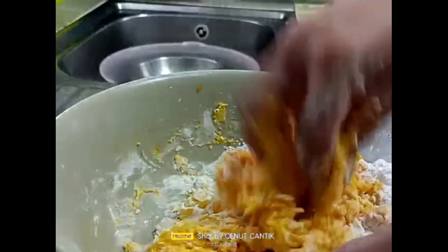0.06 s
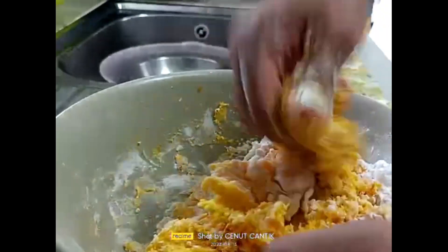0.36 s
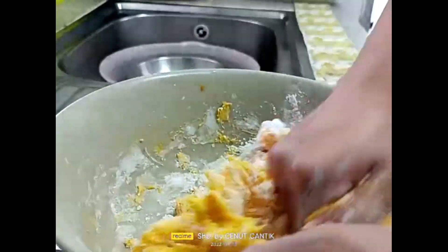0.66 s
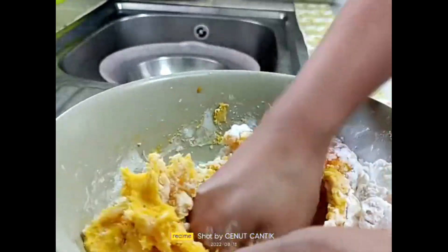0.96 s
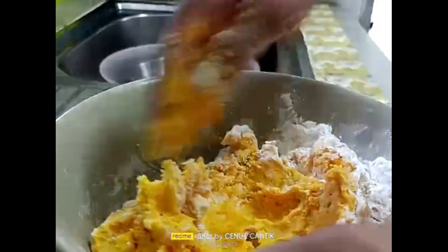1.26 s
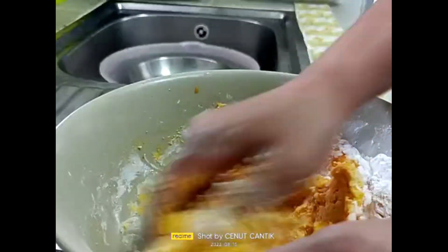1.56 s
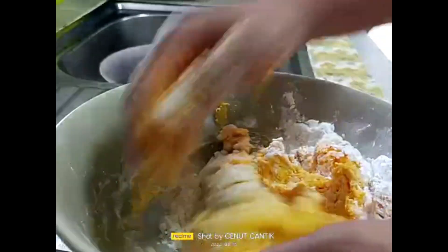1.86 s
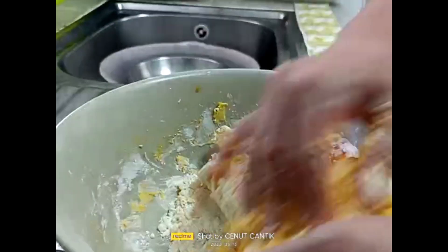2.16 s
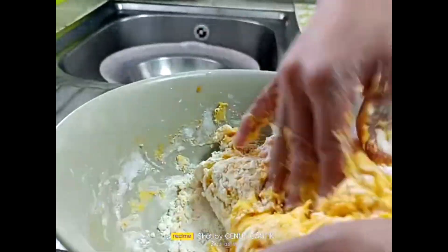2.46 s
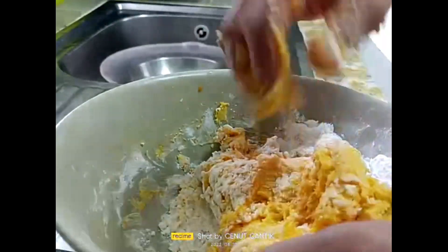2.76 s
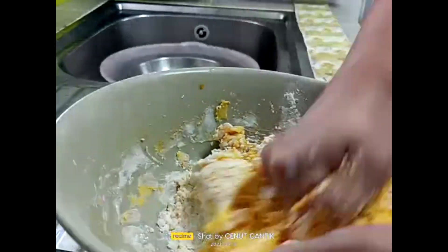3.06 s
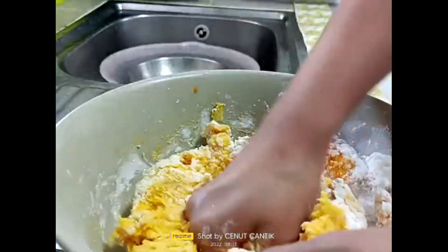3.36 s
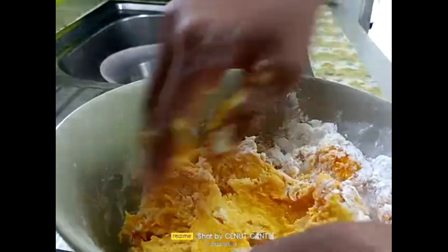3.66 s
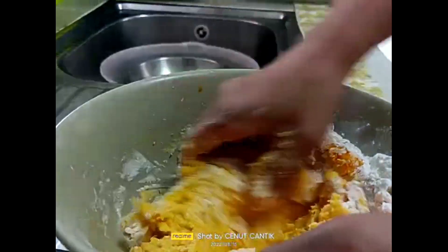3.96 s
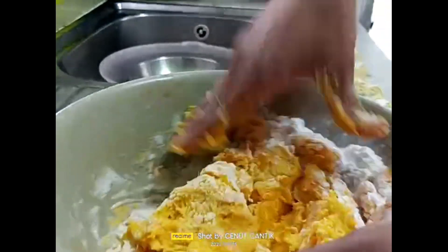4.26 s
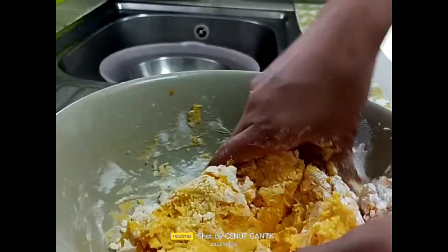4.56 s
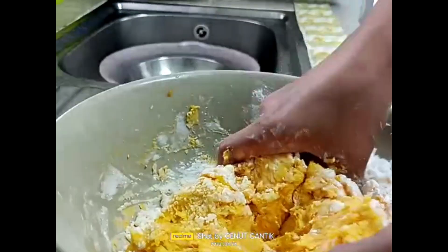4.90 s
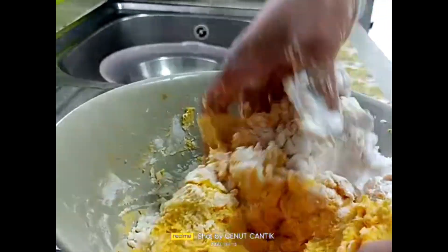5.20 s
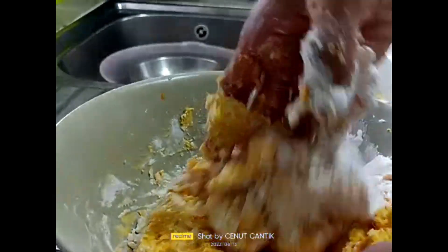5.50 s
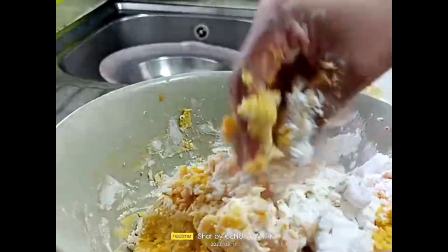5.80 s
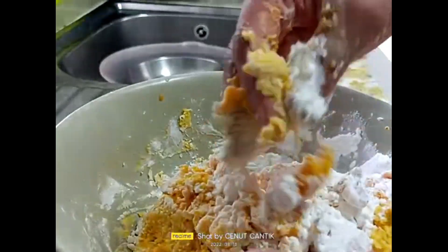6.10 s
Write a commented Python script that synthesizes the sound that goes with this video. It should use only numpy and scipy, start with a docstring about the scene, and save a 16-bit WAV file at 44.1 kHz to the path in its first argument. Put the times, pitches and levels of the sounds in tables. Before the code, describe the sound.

A hand kneads dough in a wide plastic bowl on a kitchen counter, close to the microphone. It opens with faint flour rustling, sticky squishes and light finger ticks on the rim. At about 0.9 seconds the bowl knocks on the counter and dough plops softly. A loud cluster of hard clacks follows at 1.5 seconds, with a short, low, hollow ring. More strong knocks land at 2.3 and 3.1 seconds, a medium one at 3.3, and a loud double knock at 3.6. Lighter taps, ticks and soft plops fall irregularly between them. After that the kneading is much quieter: faint squishing and rubbing, a light knock at 4.4 seconds, a tick at 4.6 and a few gentle taps around 5.2. The sound thins out toward the end at about 6 seconds. The small kitchen adds a short echo and a faint, steady low hum.

```python
"""Kneading dough in a plastic bowl

A phone sits close to a wide plastic bowl on a kitchen counter, where a hand kneads crumbly dough.
Each push rocks the bowl so that its base knocks on the counter: a hard clack, then the low ring of
the loaded bowl. Between pushes the dough squishes and plops, flour rustles and fingers tick on the
rim. Behind it all lies the hum of a small quiet kitchen."""
import sys
import numpy as np
from scipy import signal
from scipy.fft import rfft, irfft
from scipy.io import wavfile
from scipy.ndimage import uniform_filter1d

SR = 44100
rng = np.random.default_rng(int(sys.argv[2]) if len(sys.argv) > 2 else 0)


def store_pcm(level_fs):
    """Save levels as 16-bit WAV."""
    pcm = np.round(np.clip(level_fs, -1, 1) * 32767).astype(np.int16)
    wavfile.write(sys.argv[1], SR, np.atleast_2d(pcm).T)


N = 275184
TIME = np.arange(N) / SR
RING_TIME = np.arange(SR) / SR  # the second after a blow


# The bowl's base meets the counter, close to the phone. Each row: start in seconds,
# clack gain in dB, wall ring gain in dB, pitch of the struck spot in Hz.
KNOCK_HITS = [(.890, -14.5, -20, 750), (0.9429, -11.5, -12, 480), (1.5160, -2, -4, 1130),
              (1.5374, -2.5, 0.5, 940), (1.552, 3, -7.5, 694), (1.8415, -16, -18.5, 1150),
              (2.107, -17, -16, 700), (2.122, -17.5, -15, 850), (2.3132, 2.5, -14.5, 1085),
              (2.423, -13.5, -16.5, 900), (2.491, -26.5, -30, 2170), (2.878, -18.5, -17.5, 1000),
              (2.938, -29, -25, 1300), (3.0973, -.5, -4, 1120), (3.298, -9, -9, 1110),
              (3.5695, 1.5, -.5, 890), (3.622, 4, -2.5, 1050), (4.417, -24, -24, 1200),
              (5.1616, -24, -25, 890), (5.2514, -20, -29, 1000), (5.2713, -24, -24, 1000)]
# The struck spot gives way for a few cycles.
# Each row: pitch in Hz before retuning to the knock, relative level in dB, t60 in seconds.
STRUCK_SPOT_MODES = [(498, -26, 0.0053), (1006, -16, 0.0042), (2295, -27, 0.0048), (4920, -25.5, 0.0054)]
# The bowl's dense, quickly damped upper modes. Each row: frequency in Hz, gain in dB.
CLACK_COLOUR = [(150, -30.5), (400, 3), (750, 2.5), (1150, 4.5), (1520, -12.5), (1900, -3), (2500, -4.5),
                (3800, -5), (5200, -7.5), (6500, -9.5), (8500, -19.5), (15000, -14)]
# The loaded bowl's walls. Each row: pitch in Hz, relative level in dB, t60 in seconds.
BOWL_WALL_MODES = [(147.5, -39.5, 0.21), (226.9, -34.5, 0.16), (275, -42, 0.15), (352.2, -33.5, 0.13),
                   (425.3, -45, 0.12), (495, -43, 0.053), (585, -48, 0.25), (721, -44, 0.17),
                   (740, -47, 0.18), (777, -38.5, 0.13), (910, -45, 0.092), (1055, -53.5, 0.12),
                   (1144, -40, 0.07), (1798, -38.5, 0.049), (1920, -75, 0.22), (2190, -52, 0.12)]
CONTACT_RATIO, CONTACT_DB_PER_OCTAVE = 3.57, 20  # cut-off over spot pitch at 0 dB; force to double it

def knocks():
    """The rocking bowl lands: the struck spot snaps, dense modes rattle, then the walls ring."""
    out = np.zeros((2, N))
    for start, clack_db, wall_db, spot_hz in KNOCK_HITS:
        # dough lying on the spot shifts its slow modes and leaves the fast ones alone
        retune = spot_hz / STRUCK_SPOT_MODES[1][0]
        loaded = [(hz * retune if hz < 1500 else hz, db, t60) for hz, db, t60 in STRUCK_SPOT_MODES]
        spot = ring(loaded, scatter_db=5.5, port_lag_s=.00003) * (1 - fade(0.0032))
        rattle = colour(noise(SR) * (fade(0.024) + undb(-10.5) * fade(0.11)), CLACK_COLOUR)
        clack = undb(clack_db) * (undb(-23.5) * rattle - spot)
        spread = 1 - fade(0.023)  # the wave needs a few ms to get round the walls
        walls = undb(wall_db) * ring(BOWL_WALL_MODES, scatter_db=2.5, port_lag_s=.00011) * spread
        # a harder blow on a stiffer spot is brighter
        cutoff_hz = CONTACT_RATIO * spot_hz * 2 ** (clack_db / CONTACT_DB_PER_OCTAVE)
        contact = signal.butter(2, min(cutoff_hz, SR / 3), fs=SR, output="sos")
        add(out, start, signal.sosfilt(contact, clack + walls))
    return out


def base_boom(hz=96.5, t60=0.6):
    """The base, weighted by the dough, swings slowly; every knock feeds it, heavy ones most."""
    energy = np.zeros((1, N))
    for start, clack_db, wall_db, _ in KNOCK_HITS:
        blow_db = (clack_db + wall_db) / 2
        swing = undb(-33 + 0.99 * blow_db) * fade(t60) * (1 - fade(0.11))
        add(energy, start, swing ** 2)
    return np.sqrt(energy) * np.sin(2 * np.pi * hz * TIME)


# Fingers touch the rim. Each row: start in seconds, relative level in dB, snap centre in Hz,
# snap t60 in seconds, rim ring gain in dB.
FINGER_TICKS = [(0.5118, -12, 2000, 0.035, -17.5), (0.7863, -4, 8800, 0.0088, -30),
                (0.874, -8, 4440, 0.025, -22), (0.941, -11, 4700, 0.045, -11),
                (1.1325, -12, 6370, 0.024, -18.5), (1.5373, -3.5, 5440, 0.033, -32),
                (1.6065, -5.5, 4400, 0.055, -9.5), (2.2524, -19.5, 5500, 0.054, -14),
                (3.3592, -7.5, 5800, 0.031, -0.5), (4.417, -17.5, 3020, 0.035, -7),
                (4.634, -12, 1140, 0.074, -7.5)]
# The rim's resonances. Each row: centre in Hz, nominal width in Hz, relative level in dB, t60 in seconds.
RIM_RESONANCES = [(2350, 165, -28.5, 0.043), (3330, 120, -35.5, 0.078), (5760, 1300, -39, 0.041)]

def rim_ticks():
    """Light hard touches: a short snap and the brief ring of the rim."""
    out = np.zeros((2, N))
    for start, db, snap_hz, snap_t60, ring_db in FINGER_TICKS:
        snap = focus(noise(SR), snap_hz, q=1.45) * fade(snap_t60) * undb(-39.5)
        rim = sum(undb(mode_db) * fade(t60) * focus(noise(SR), hz, q=hz / width / 2)
                  for hz, width, mode_db, t60 in RIM_RESONANCES)
        add(out, start, undb(db) * (snap + undb(ring_db) * rim))
    return out


# Soft dough lands in the bowl. Each row: start in seconds, level in dB, first pitch in Hz,
# final pitch in Hz, t60 in seconds.
DOUGH_PLOPS = [(0.942, -37.5, 405, 181, 0.23), (2.115, -49, 271, 172, .15), (2.429, -48, 252, 177, 0.21),
               (3.102, -42, 213, 150, 0.19), (3.361, -44.5, 365, 248, 0.18)]

def plops():
    """A lump of dough slaps down, its hollow note falling as it spreads."""
    out = np.zeros((2, N))
    for start, db, first_hz, final_hz, t60 in DOUGH_PLOPS:
        glide_hz = final_hz + (first_hz - final_hz) * fade(0.197)
        hz = glide_hz * (1 + 0.14 * wander(195)[:SR])  # the lump settles unevenly
        hollow = undb(2.9 * wander(225)[:SR]) * np.sin(2 * np.pi * np.cumsum(hz) / SR)
        slap = focus(noise(SR), first_hz, q=0.69) * fade(0.089)
        add(out, start, undb(db) * fade(t60) * (hollow + undb(-7) * slap))
    return out


# Squishes in the bowl. Each row: peak time in seconds, level in dB, half length in seconds, centre in Hz.
DOUGH_SQUISHES = [(0.155, -65, 0.032, 4200), (.55, -74, 0.064, 5430), (1.165, -50, 0.0092, 4300),
                  (1.165, -55, 0.012, 1040), (1.768, -75, 0.074, 6600), (2.043, -60, 0.019, 2350),
                  (2.2, -72, 0.16, 3500), (2.718, -65.5, 0.014, 5000), (3.302, -66, 0.056, 4070),
                  (3.904, -62.5, 0.012, 4000), (4.082, -67, .04, 2170), (4.258, -67, 0.022, 5100),
                  (4.553, -68.5, 0.087, 6100), (4.69, -67, 0.11, 4200), (4.94, -66, 0.095, 4600),
                  (4.984, -64, 0.049, 2500), (6.213, -69, 0.022, 3000)]

def squishes():
    """Sticky dough pulls apart and flour slides, in broad swells of crackle."""
    return sum(stroke(*row, q=1.0) for row in DOUGH_SQUISHES)


# Spells of rubbing, faint even this close. Each row: start in seconds, end in seconds, level in dB.
RUB_SPELLS = [(0, 2.74, -69), (3.2, 3.66, -67.5), (3.87, 5.15, -69)]
# The tone of the rustle. Each row: frequency in Hz, gain in dB.
FLOUR_COLOUR = [(300, -2.5), (700, 8.5), (1200, 3.5), (2500, 1), (5000, -4), (7500, -9.5), (10000, -12.5),
                (15000, -25)]

def flour_rustle(attack_s=0.02, release_s=0.13, wander_db=2.1):
    """The hand rubs through flour with uneven effort."""
    effort = 0
    for start, end, db in RUB_SPELLS:
        attack = np.clip((TIME - start) / attack_s, 0, 1)
        release = np.exp(-np.maximum(TIME - end, 0) / release_s)
        effort = np.maximum(effort, undb(db) * attack * release)
    level = effort * undb(wander_db * wander(10))
    return level * unit(colour(crackle(rate=300), FLOUR_COLOUR))


# Skin on plastic. Each row: peak time in seconds, level in dB, half length in seconds,
# pitch in Hz, sharpness as Q.
FINGER_SQUEAKS = [(0.587, -73.5, .1, 3100, 7.5), (5.655, -71.5, 0.034, 2100, 16)]

def squeaks():
    """A finger squeaks faintly along the bowl."""
    return sum(stroke(*row) for row in FINGER_SQUEAKS)


def kitchen_echo(x, low_t60=0.25, treble_t60=0.16, echo_db=-9.5):
    """Counter, sink and tiled walls give a short diffuse tail whose treble dies first."""
    low = colour(noise(SR), [(100, -10), (300, -2.5), (1000, -4.5), (2500, -6), (15000, -39)])
    high = colour(noise(SR), [(500, -22.5), (1500, -14.5), (3300, 2.5), (6000, 0.5),
                              (9000, -1), (15000, -9.5)])
    onset = np.clip((RING_TIME - .004) / 0.0044, 0, 1)
    tail = (low * fade(low_t60) + high * fade(treble_t60)) * onset
    tail = tail / np.sqrt(np.sum(tail ** 2) / 2)
    return x + undb(echo_db) * signal.fftconvolve(x, tail, axes=1)[:, :N]


# The kitchen air around the phone. Each row: frequency in Hz, gain in dB.
AIR_COLOUR = [(20, -10), (35, -8), (55, -7), (75, -17), (110, -15), (260, -18.5), (350, -21.5),
              (500, -21.5), (690, -26), (900, -24), (1400, -35.5), (2400, -39.5), (7000, -49),
              (15500, -49.5)]
# The room's hum. Each row: centre in Hz, level in dB.
HUM_BANDS = [(100, -66), (225, -69.5), (355, -71), (480, -69.5)]
# The slow rise and fall of the rumble. Each row: time in seconds, relative level in dB.
RUMBLE_LEVELS = [(0.0, -60), (0.99, -52.5), (1.63, -55.5), (2.55, -47), (3.25, -57.5), (4.05, -55.5),
                 (6.08, -60.5), (6.24, -48.5)]

def room_tone():
    """Room air, a soft even hiss, a faint wavering hum and a low throbbing rumble."""
    air = unit(colour(noise(N), AIR_COLOUR)) * undb(-57.5 + 1.2 * wander(8.6))
    hiss = signal.sosfilt(signal.butter(10, 7000, fs=SR, output="sos"), noise(N)) * undb(-65)
    hum = sum(undb(db) * unit(band(noise(N), hz, q=34.6)) for hz, db in HUM_BANDS)
    rumble_hz = 32.1 + 3.41 * wander(9.4)
    sway = np.sin(2 * np.pi * np.cumsum(rumble_hz) / SR)
    throb = 1 + 0.55 * np.tanh(wander(13))
    rumble_db = np.interp(TIME, *np.transpose(RUMBLE_LEVELS)) - 0.6
    return air + hiss + hum + unit(sway * throb) * undb(rumble_db)


# How alike left and right are at the phone. Each row: frequency in Hz, likeness from 0 to 1.
STEREO_LIKENESS = [(50, 0.95), (150, 0.85), (350, 0.95), (700, 0.02), (1200, 0.19), (2500, 0), (15000, 0)]

def noise(size):
    """Stereo noise, alike in the bass and unrelated in the treble."""
    alike = np.clip(at_bins(STEREO_LIKENESS, size), 0, 1)
    weights = np.sqrt([(1 + alike) / 2, (1 - alike) / 2])
    mid, side = irfft(rfft(rng.standard_normal((2, size))) * weights, size)
    return np.array([mid + side, mid - side])


def ring(modes, scatter_db, port_lag_s):
    """Struck modes, weighted anew by each blow, reach the two microphone ports slightly apart."""
    out = 0
    for (hz, db, t60), (weight, lag) in zip(modes, rng.standard_normal((len(modes), 2))):
        phase = 2 * np.pi * hz * (RING_TIME + np.array([[1], [-1]]) * lag * port_lag_s)
        out = out + undb(db + scatter_db * weight) * fade(t60) * np.sin(phase)
    return out


def crackle(rate, spread_db=1.5):
    """Dense tiny bursts of sticky threads and crumbs."""
    return unit(noise(N) * undb(spread_db * wander(rate)))


def stroke(peak_s, db, half_s, hz, q):
    """A crackle that swells and fades round one resonance."""
    swell = np.exp(-((TIME - peak_s) / half_s) ** 2 / 2)
    return undb(db) * swell * focus(crackle(rate=810), hz, q)


def undb(db):
    """Decibels to gain."""
    return 10 ** (np.asarray(db) / 20)


def unit(x):
    """Scale to rms 1."""
    return x / np.sqrt(np.mean(x ** 2))


def fade(t60):
    """One second of decay, falling 60 dB in t60 seconds."""
    return np.exp(-np.log(1000) * RING_TIME / t60)


def wander(rate):
    """Smooth random drift of rms 1, with `rate` turns a second."""
    hold = int(SR / rate)
    steps = np.repeat(rng.standard_normal(N // hold + 1), hold)
    return unit(uniform_filter1d(steps, hold)[:N])


def at_bins(points, size):
    """A table of (Hz, value) read at every bin of a spectrum."""
    hz, value = np.transpose(points)
    return np.interp(np.log(np.fft.rfftfreq(size, 1 / SR) + 1), np.log(hz), value)


def colour(x, points):
    """Causal filter with the gains of a (Hz, dB) table."""
    size = x.shape[-1]
    cepstrum = irfft(np.log(undb(at_bins(points, size))), size)
    cepstrum[1:size // 2] *= 2
    cepstrum[size // 2 + 1:] = 0
    return irfft(rfft(x) * np.exp(rfft(cepstrum)), size)


def band(x, hz, q):
    """A resonance with gain 1 at its centre."""
    return signal.lfilter(*signal.iirpeak(min(hz, SR / 3), max(q, 4 * hz / SR), fs=SR), x)


def focus(x, hz, q):
    """A steep resonance, scaled to rms 1."""
    return unit(band(band(x, hz, q), hz, q))


def add(out, start_s, sound):
    """Mix a sound in at a given time."""
    start = int(start_s * SR)
    out[:, start:start + sound.shape[-1]] += sound[..., :N - start]


def scene():
    """Bowl and dough close up, the kitchen behind them."""
    kneading = knocks() + rim_ticks() + flour_rustle() + squishes() + squeaks() + plops()
    return kitchen_echo(kneading) + base_boom() + room_tone()


# The phone's two microphone ports. Each row: frequency in Hz, left minus right in dB.
PORT_BALANCE = [(60, 0), (110, 1.5), (200, 2.5), (380, -3.5), (700, 0.5), (1290, 1), (2380, 0.5),
                (4400, 3.0), (8120, -5.0), (15000, 2.5)]

def record(dry, top_hz=15500):
    """Each port of the phone adds its own colour; the phone cuts the top."""
    port_db = np.array([[1], [-1]]) * at_bins(PORT_BALANCE, N) / 2
    heard = irfft(rfft(dry) * undb(port_db), N)
    return signal.sosfilt(signal.ellip(10, .2, 70, top_hz, fs=SR, output="sos"), heard)


dry = scene()
out = record(dry)
store_pcm(out)
```